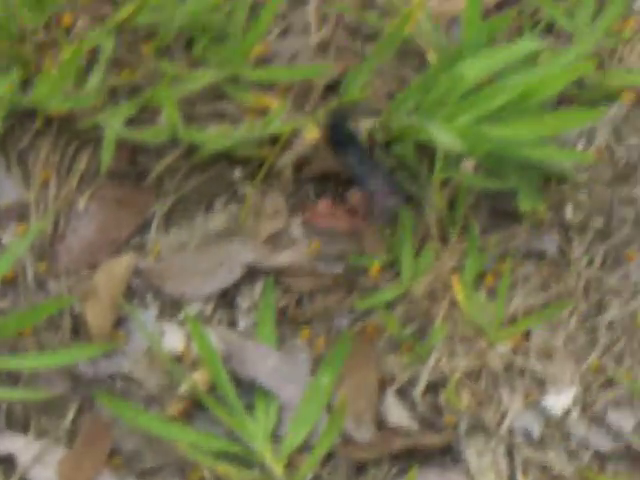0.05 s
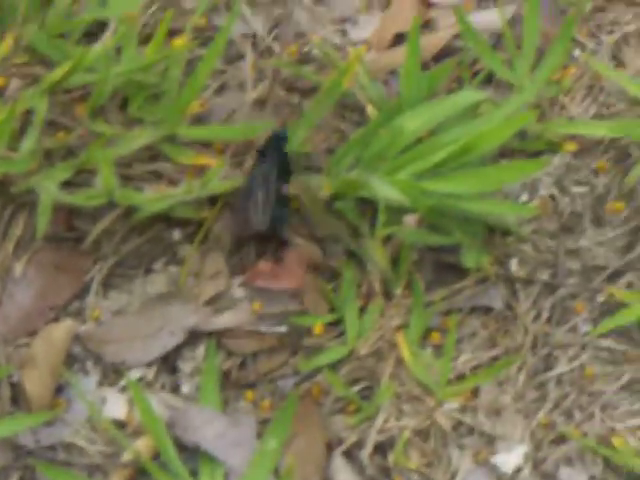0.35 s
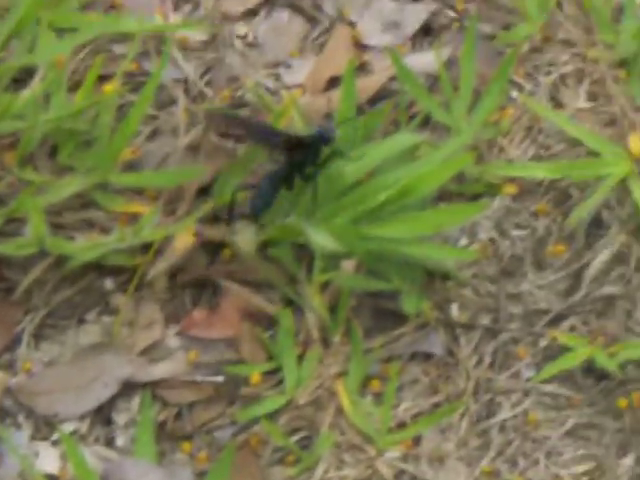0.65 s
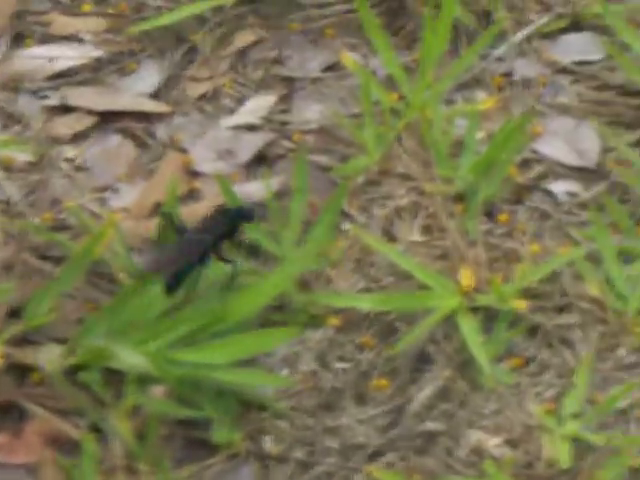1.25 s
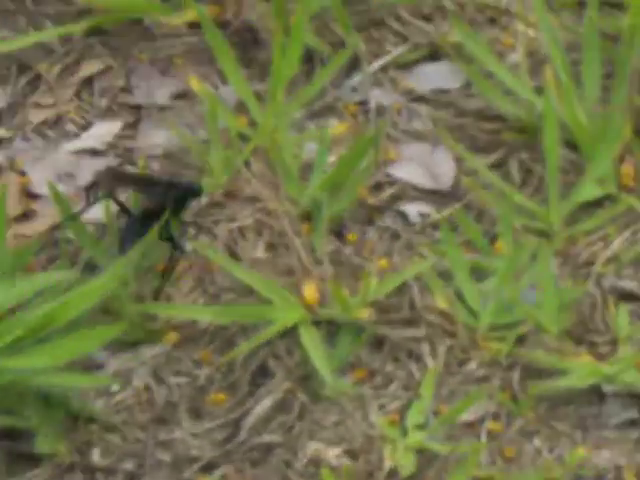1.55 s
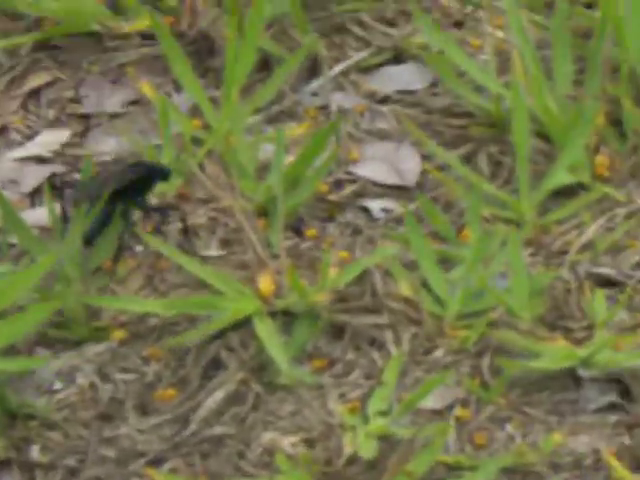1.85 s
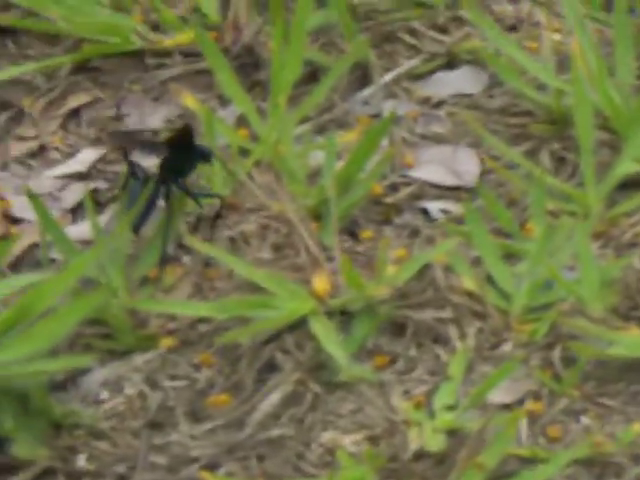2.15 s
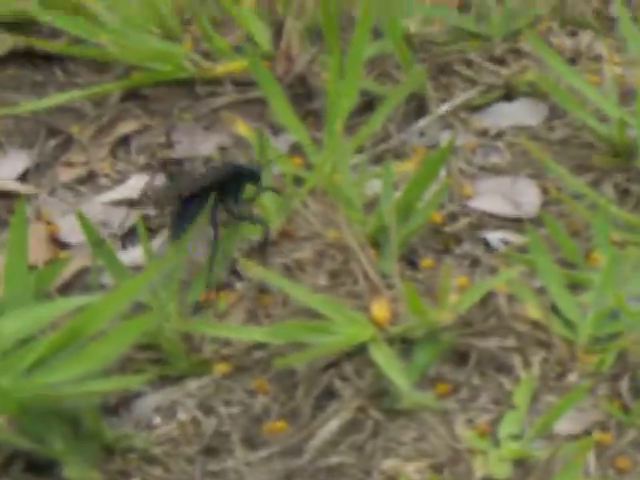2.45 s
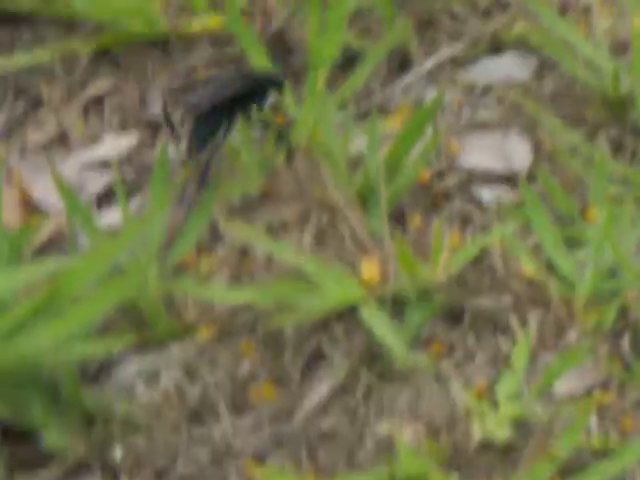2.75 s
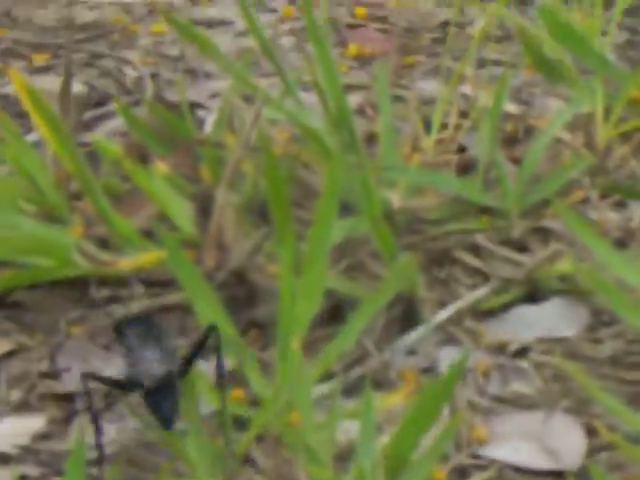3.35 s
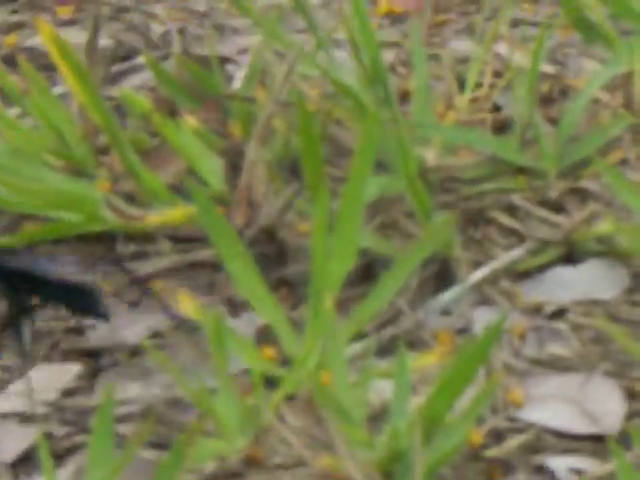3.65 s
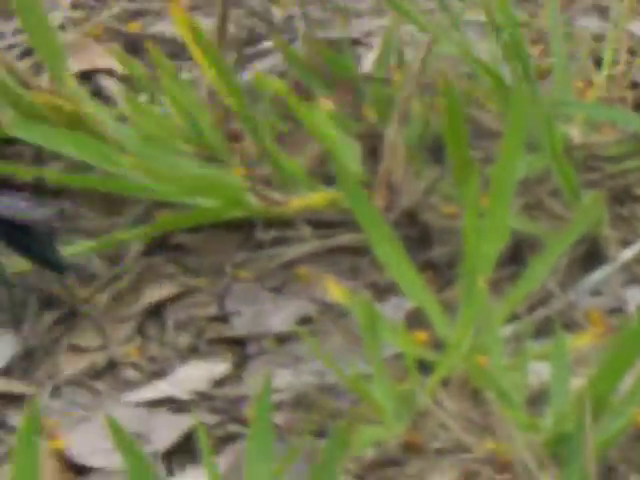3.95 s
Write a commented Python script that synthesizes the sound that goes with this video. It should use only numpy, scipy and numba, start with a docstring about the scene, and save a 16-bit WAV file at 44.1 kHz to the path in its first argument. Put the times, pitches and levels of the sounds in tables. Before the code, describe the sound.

Scattered dry clicks and light rustling come from a big insect crawling through leaf litter, then a loud, brief crack. Faint birds and a low outdoor hush lie behind, with small handling bumps on the nearby microphone.

```python
"""A faint rustle: a large insect scrambles over leaves and grass, its legs scratching the litter. A hand-held
camera follows closely; handling knocks on its body sound as dry ticks and knocks, with soft rubs on the casing.
Each tick or knock is a short push into damped modes; one rattling crack, four quick blows, leaves a thin ring.
Birds whistle far off over quiet outdoor air, and the recorder's gain dips after the crack."""
import sys
import numpy as np
from scipy import signal
from scipy.fft import rfft, irfft
from scipy.io import wavfile
from scipy.ndimage import uniform_filter1d
from numba import njit

SR = 44100
rng = np.random.default_rng(int(sys.argv[2]) if len(sys.argv) > 2 else 0)


def master(y):
    """Save y as 16-bit WAV."""
    cut = np.clip(np.atleast_2d(y).T, -1, 1)
    pcm = np.round(cut * 32767)  # scale
    wavfile.write(sys.argv[1], SR, pcm.astype(np.int16))


N = 176400


def undb(db):
    """Decibels to gain."""
    return 10 ** (np.asarray(db) / 20)


def unit(x):
    """Scale to rms 1."""
    return x / np.sqrt(np.mean(x ** 2))


def add(out, at_s, x):
    """Mix x into out from a given time."""
    i = int(round(at_s * SR))
    out[i:i + len(x)] += x[:max(len(out) - i, 0)]


def colour(x, points):
    """EQ a sound along a curve of (frequency [Hz], gain [dB]) points."""
    hz, db = np.array(points).T
    bin_hz = np.maximum(np.fft.rfftfreq(len(x), 1 / SR), 1)
    return irfft(rfft(x) * undb(np.interp(np.log(bin_hz), np.log(hz), db)), len(x))


def low_cut(x, hz):
    """Thin out the bass below a given frequency."""
    return signal.sosfilt(signal.butter(2, hz, "high", fs=SR, output="sos"), x)


def walk(rate_hz):
    """Smooth random wander with rms 1."""
    hold = max(int(SR / rate_hz), 1)
    steps = np.repeat(rng.standard_normal(N // hold + 1), hold)
    return unit(uniform_filter1d(steps, hold)[:N])


def fade(t, t60):
    """Exponential decay, 60 dB in t60 seconds."""
    return np.exp(-np.log(1000) * t / t60)


def modes(table, t, pitch=1):
    """Damped sines that build up in about a cycle, their tuning and level a little different each time."""
    detune, scatter_db, rise_cycles = .012, .8, .84
    out = 0
    for (freq, t60, db), (level_draw, pitch_draw) in zip(table, rng.standard_normal((len(table), 2))):
        cycles = freq * pitch * (1 + detune * pitch_draw) * t
        envelope = fade(t, t60) * (1 - np.exp(-cycles / rise_cycles))
        out = out + undb(db + scatter_db * level_draw) * envelope * np.sin(2 * np.pi * cycles)
    return out


def push(t):
    """Force of one contact: a very short push, brief chatter and a faint tail."""
    chatter = undb(-27.5) * fade(t, t60=.016)
    tail = undb(-40) * fade(t, t60=.04)
    return fade(t, t60=.00008) + rng.standard_normal(len(t)) * (chatter + tail)


def strike(force, body, db):
    """Drive a body with a force; the hit has the energy of a 2 ms sine peaking at db."""
    hit = signal.fftconvolve(force, body)[:len(body)]
    return hit * undb(db) * np.sqrt(.002 * SR / 2 / np.sum(hit ** 2))


def friction(strokes, spectrum):
    """Sliding contact: short swells of coloured noise."""
    swell = np.zeros(N)
    for at_s, length_s, db in strokes:
        add(swell, at_s, undb(db) * np.sqrt(np.hanning(int(length_s * SR))))
    return swell * unit(colour(rng.standard_normal(N), spectrum))


def air():
    """A quiet outdoor bed of rumble and smooth hiss, gently swelling."""
    # tone of the air (frequency [Hz], gain [dB])
    spectrum = [(20, -1), (70, -1.5), (140, -1.5), (280, -4), (600, -7.5), (1900, -15), (5100, -17.5),
                (10000, -21), (12500, -37.5)]
    level_db, swell_db = -57.5, 1.21
    bed = unit(colour(rng.standard_normal(N), spectrum))
    return bed * undb(level_db + swell_db * walk(rate_hz=2.64))


def birds():
    """Gliding, slightly wavering whistles, blurred by distance."""
    # bird calls (time [s], length [s], start pitch [Hz], middle pitch [Hz], end pitch [Hz], level [dB])
    whistles = [(0.566, 0.067, 6300, 5700, 4900, -66), (.84, .13, 6350, 5700, 4920, -65),
                (1.067, 0.13, 6300, 5200, 4230, -59.5), (1.34, .11, 4250, 4550, 4800, -59),
                (1.43, 0.21, 4870, 5930, 6330, -64), (2.162, 0.17, 5180, 4750, 3950, -62),
                (2.307, 0.15, 5200, 6000, 6300, -64), (2.6, .15, 5150, 4690, 3870, -63),
                (2.852, 0.041, 3530, 3250, 2540, -55), (2.91, 0.037, 3420, 3250, 2500, -54.5),
                (2.99, .05, 3000, 2930, 2520, -53), (3.784, 0.14, 3070, 2930, 2980, -64)]
    calls, t = np.zeros(N), np.arange(SR // 2) / SR
    waver = 1 + .0177 * walk(rate_hz=400)
    tail = rng.standard_normal(len(t)) * fade(t, t60=.25)
    for at_s, length_s, start_hz, middle_hz, end_hz, db in whistles:
        progress = np.linspace(0, 1, int(length_s * SR))
        glide = np.polyval(np.polyfit([0, .5, 1], [start_hz, middle_hz, end_hz], 2), progress)
        hz = glide * waver[int(at_s * SR):][:len(glide)]
        envelope = np.abs(np.hanning(len(glide))) ** .2
        add(calls, at_s, undb(db) * envelope * np.sin(2 * np.pi * np.cumsum(hz) / SR))
    reverb = signal.fftconvolve(calls, tail / np.linalg.norm(tail))[:N]
    wet = undb(1)
    return (calls + wet * reverb) / np.hypot(1, wet)


def casing_rubs():
    """Handling noise: soft, dull rubs on the camera's casing."""
    # rubs (time [s], length [s], level [dB])
    strokes = [(.47, 0.023, -59), (0.599, 0.037, -63), (1.609, 0.031, -53), (2.208, 0.023, -47),
               (2.457, 0.027, -51.5), (2.593, 0.072, -51), (2.783, 0.026, -50.5), (2.813, 0.029, -50.5)]
    # tone of the rubbed casing (frequency [Hz], gain [dB])
    spectrum = [(100, -25), (350, -2), (530, -2.5), (640, 3.5), (800, -11), (1500, -12.5), (2600, -7),
                (4500, -21.5), (12000, -34)]
    return friction(strokes, spectrum)


def rustle():
    """Legs stir the litter: dense, tiny grains of dry leaf and grass, uneven in size."""
    # rustle envelope (time [s], level [dB])
    envelope = [(0, -90), (.95, -69), (1.2, -55), (1.5, -60.5), (1.75, -58), (2.0, -61.5), (2.3, -61),
                (2.55, -63.5), (2.8, -61.5), (3.15, -61), (3.35, -70), (4, -78)]
    # tone of the litter (frequency [Hz], gain [dB])
    spectrum = [(200, -2), (700, -1.5), (1400, -5), (2600, -3), (4500, -10), (7000, -13.5), (12000, -23.5)]
    grains_per_s, spread_db = 1500, 1.5
    grains = (rng.random(N) < grains_per_s / SR) * rng.choice([-1, 1], N)
    sizes = undb(spread_db * np.minimum(rng.exponential(size=N), 5))
    level_db = np.interp(np.arange(N) / SR, *np.array(envelope).T)
    return unit(colour(grains * sizes, spectrum)) * undb(level_db)


def leg_scratches():
    """A leg drags along a leaf with a dry, bright scratch."""
    # scratches (time [s], length [s], level [dB])
    strokes = [(.592, .012, -59), (.61, 0.027, -56), (1.28, 0.053, -59)]
    # tone of the scratched leaf (frequency [Hz], gain [dB])
    spectrum = [(500, -25), (2500, -10), (4500, 5), (7000, -3), (12000, -6)]
    return friction(strokes, spectrum)


def ticks_and_knocks():
    """Each contact sounds three layers: a short ring, a low thud and a treble snap."""
    # contacts (time [s], ring level [dB], ring pitch [Hz], thud [dB re ring], snap [dB re ring])
    contacts = [(0.1598, -35, 2190, 2.5, -28), (1.0401, -37.5, 2680, -8.5, -3), (1.1945, -55, 2240, -6, 1),
                (1.2305, -43.5, 2430, -21, -2), (1.424, -39.5, 2730, -20, -9),
                (1.4963, -42.5, 2430, -12, -7.5), (1.502, -46, 2500, -14, -10), (1.549, -43, 2120, -9, -14),
                (1.609, -43.5, 2800, -12, -15), (1.657, -43.5, 2430, -21, -10),
                (1.693, -45.5, 3300, -23, -13), (1.7357, -42, 2600, -2, -4.5), (1.7388, -47, 2900, -13, -4),
                (1.8191, -37, 2680, -27, -12), (1.8232, -41, 2600, -16, -6), (1.862, -36, 2030, -5, -10),
                (1.8997, -40.5, 3130, -7, -10), (1.9275, -45, 2200, 0, -12), (1.9362, -23, 2670, -22, -18),
                (2.0298, -42.5, 2620, -16, -2), (2.1947, -50.5, 2300, 7, -30),
                (2.2073, -31.5, 2220, -7, -19), (2.214, -38.5, 2660, -1, -3), (2.2157, -36, 2600, 5, -1),
                (2.2982, -46, 2420, -19, -22), (2.5979, -46.5, 2300, 11, -9), (2.6026, -39, 2440, 1, 1),
                (2.6094, -33, 2280, -16, -17), (2.8264, -46.5, 2440, -1, -4), (2.83, -38.5, 2730, -26, -12),
                (2.8489, -38, 2300, -17, -18), (3.0678, -28, 2240, -10.5, -3.5),
                (3.0765, -40, 2430, -3, -16), (3.1103, -19, 2770, -3, -12), (3.1532, -37.5, 2300, -7, -16),
                (3.357, -53, 2170, -2, -14), (3.3606, -52, 2200, 14, -22), (3.7998, -39.5, 2320, -12, -8),
                (3.9952, -36.5, 2280, -4, -24)]
    # modes of the ring (frequency [multiple of ring pitch], t60 [s], relative level [dB])
    ring_modes = [(.86, 0.0031, 3), (1, 0.0059, 4), (1.17, .006, -18)]
    # modes of the thud (frequency [Hz], t60 [s], relative level [dB])
    thud_modes = [(257, 0.01, -7), (482, 0.0082, -2), (652, 0.043, -18), (852, 0.0084, 2),
                  (1220, 0.0086, -7)]
    # modes of the snap (frequency [Hz], t60 [s], relative level [dB])
    snap_modes = [(4040, 0.0033, 1), (5470, 0.0025, 0.5), (6500, 0.0019, 2.5), (8600, 0.0011, -4)]
    out, t = np.zeros(N), np.arange(SR // 10) / SR
    for at_s, db, hz, thud_db, snap_db in contacts:
        force = push(t)
        thud = strike(force, low_cut(modes(thud_modes, t), hz=120), db + thud_db)
        ring = strike(force, modes(ring_modes, t, pitch=hz), db)
        snap = strike(force, modes(snap_modes, t), db + snap_db)
        add(out, at_s, ring + thud - snap)
    return out


def crack():
    """Hard blows hit a small, stiff body within milliseconds, and two thin modes ring on."""
    # blows (time [s], level [dB], contact time [ms])
    blows = [(3.2075, -19.5, 0.18), (3.2106, -9.5, 0.085), (3.2112, -8.5, 0.036), (3.2155, -9, 0.031)]
    # modes of the body (frequency [Hz], t60 [s], relative level [dB])
    body_modes = [(308, 0.0076, -15), (830, 0.011, -7.5), (926, 0.01, -12), (1467, 0.014, -12.5),
                  (1637, 0.052, -26.5), (2100, 0.0092, -2.5), (2530, 0.014, -1), (2600, 0.18, -37.5),
                  (2750, 0.014, -5.5), (3935, 0.0078, 1), (5600, 0.0053, -3), (6910, 0.0091, -3),
                  (9030, 0.0028, 0)]
    out, t = np.zeros(N), np.arange(SR // 3) / SR
    body = low_cut(modes(body_modes, t), hz=220)
    for at_s, db, contact_ms in blows:
        softness = np.exp(-1000 / (contact_ms * SR))  # a longer contact is duller
        force = signal.lfilter([1], [1, -softness], push(t))
        add(out, at_s, strike(force, body, db))
    return out


def scene():
    """All sources at one microphone."""
    sliding = casing_rubs() + leg_scratches()
    return (sliding + air() + rustle() + birds() + crack() + ticks_and_knocks())[None]


@njit
def follow(x, attack, release):
    """Level follower with separate rise and fall."""
    out, level = np.empty(len(x)), 0.
    for i in range(len(x)):
        level += (abs(x[i]) - level) * (attack if abs(x[i]) > level else release)
        out[i] = level
    return out


def record(dry):
    """The microphone dulls the top, gain control ducks after loud peaks, and a steep high cut follows."""
    # microphone response (frequency [Hz], gain [dB])
    response = [(20, 2.5), (7200, -2), (7700, -4.5), (8200, 1.5), (10200, 0.5), (11200, -3), (12200, -14)]
    threshold_db, attack_s, release_s, duck_slope = -41.5, .049, .19, .42
    top_hz = 12200
    mic = colour(np.pad(dry[0], (0, SR)), response)[:N]
    level = follow(mic, 1 / (attack_s * SR), 1 / (release_s * SR))
    gain = np.maximum(level / undb(threshold_db), 1) ** -duck_slope
    high_cut = signal.ellip(8, .2, 70, top_hz, fs=SR, output="sos")
    return signal.sosfilt(high_cut, mic * gain)[None]


dry = scene()
out = record(dry)
master(out)
```